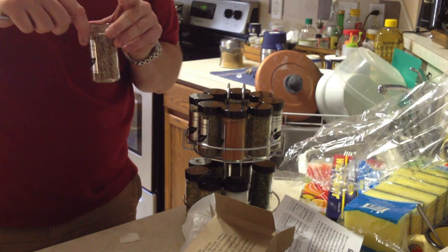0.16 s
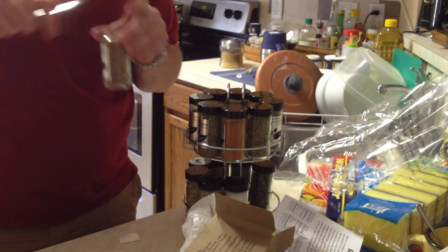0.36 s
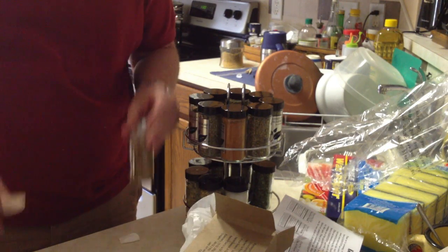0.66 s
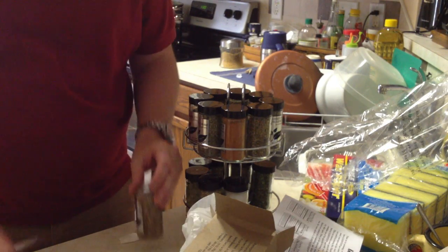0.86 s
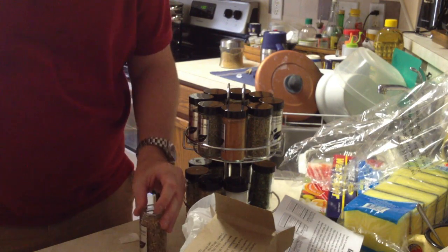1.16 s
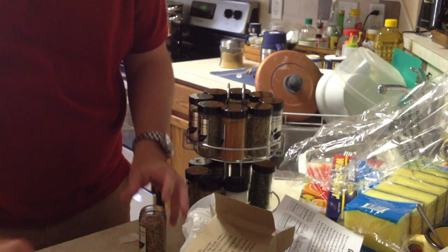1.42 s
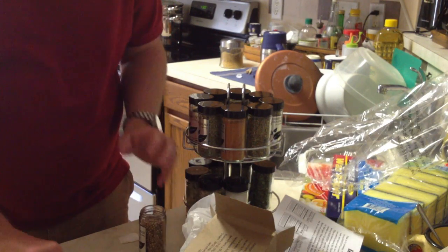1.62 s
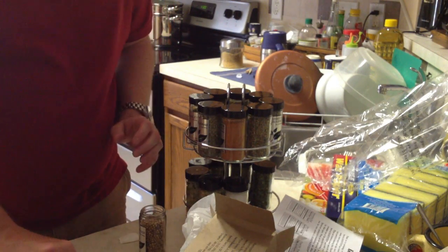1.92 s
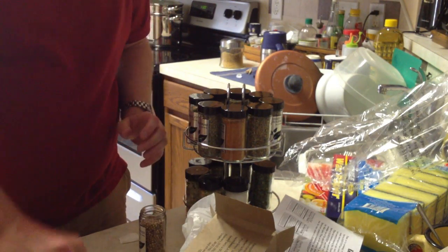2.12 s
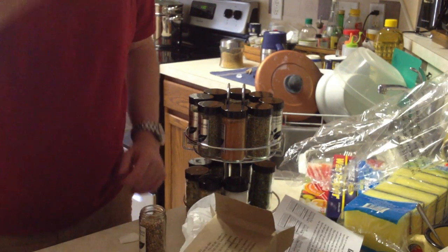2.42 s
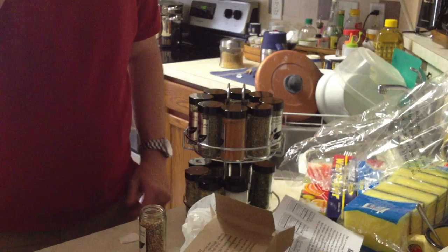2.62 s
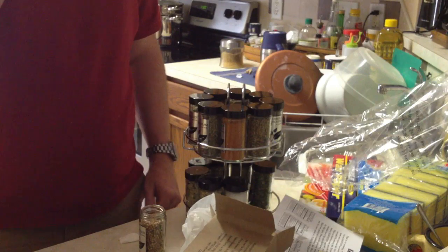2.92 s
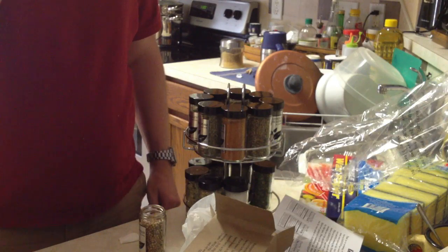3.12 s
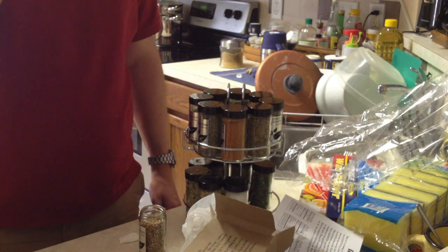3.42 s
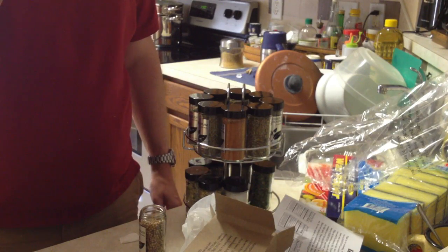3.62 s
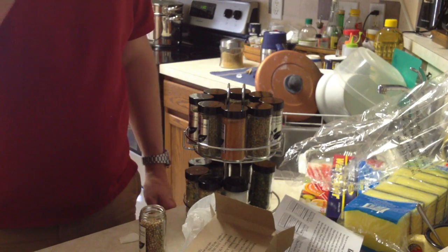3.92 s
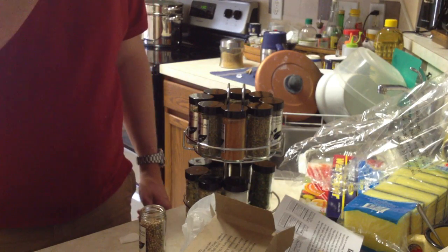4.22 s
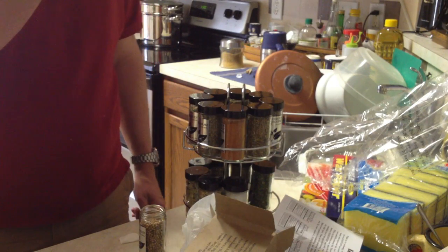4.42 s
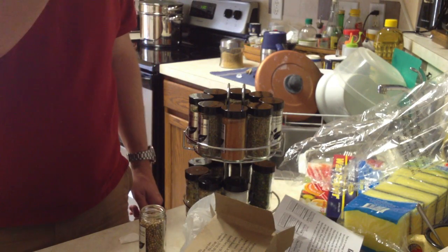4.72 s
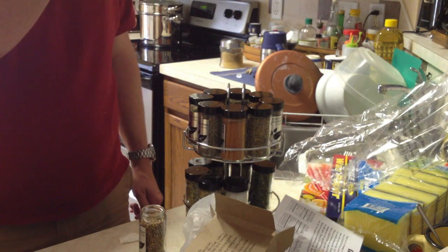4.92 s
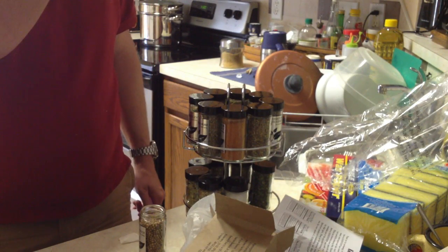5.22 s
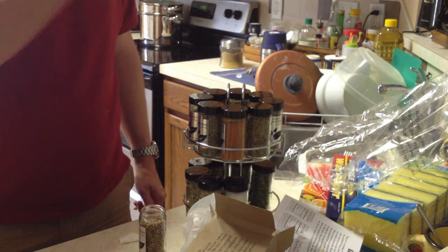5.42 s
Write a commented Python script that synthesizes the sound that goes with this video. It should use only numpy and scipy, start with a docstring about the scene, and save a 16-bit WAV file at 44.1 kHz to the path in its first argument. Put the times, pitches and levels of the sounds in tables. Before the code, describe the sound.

A spice jar is set down with sharp knocks, light metal clatters beside it, and scattered plastic clicks follow over a faint hum.

```python
"""A small, hard kitchen, one microphone close to the counter, a refrigerator humming behind. A small
glass spice jar is set down, edge first, then flat: the board knocks and shudders, and the seeds inside
slide. A light metal piece, likely a funnel, drops beside it and bounces, ringing. Fingers rub a plastic
lid, which clicks as it slips against a jar, faintly at first and more clearly later."""
import sys
import numpy as np
from scipy import signal
from scipy.fft import rfft, irfft
from scipy.io import wavfile

SR = 44100
rng = np.random.default_rng(int(sys.argv[2]) if len(sys.argv) > 2 else 0)


def put_to_file(sound):
    """Save the sound as 16-bit audio at rate SR, in the file named by the first command-line argument."""
    columns = np.atleast_2d(sound).T  # one column per channel
    safe = np.clip(columns, -1, 1)
    whole_steps = np.round(safe * 32767)
    wavfile.write(sys.argv[1], SR, whole_steps.astype(np.int16))


N = 245195


def amp(db):
    """Decibels to amplitude."""
    return 10 ** (np.asarray(db) / 20)


def read(points, hz):
    """A spectrum's value on a log-frequency axis."""
    f, value = np.transpose(points)
    return np.interp(np.log(hz + 1), np.log(f + 1), value)


def add(mix, s, sound):
    """Mixes a sound in at s seconds."""
    part = mix[round(s * SR):][:len(sound)]
    part += sound[:len(part)]


def wander(per_s, size):
    """A slow random curve of rms about 1."""
    knots = rng.standard_normal(size=400)
    return np.interp(np.arange(size) * per_s / SR, np.arange(len(knots)), knots)


def coloured(noise, colour):
    """Gives noise a spectrum, at rms 1."""
    gain = amp(read(colour, np.fft.rfftfreq(len(noise), 1 / SR)))
    shaped = irfft(rfft(noise) * gain, len(noise))
    return shaped / np.sqrt(np.mean(shaped ** 2) + 1e-20)


def pulse(colour, corner_hz=SR, weight_db=0, size=2048):
    """A click of peak 1 with this colour; a soft contact loses treble, a heavy one gains bass."""
    hz = abs(np.fft.fftfreq(size, 1 / SR))
    contact = 1 / np.sqrt(1 + (hz / corner_hz) ** 8) + amp(-46)
    bass_db = weight_db / (1 + (hz / 400) ** 2)
    log_gain = np.log(amp(read(colour, hz) + bass_db) * contact)
    minimum_phase = np.exp(np.conj(signal.hilbert(log_gain)))
    click = np.fft.ifft(minimum_phase).real[:size // 2]
    return click / abs(click).max()


def scatter(sound, decay, size):
    """Dense echoes of a sound, each band dying at its own speed; decay pairs Hz with t60 in seconds."""
    taps = rng.choice([-1., 1.], size) * (rng.random(size) < .25)
    hz, t, bands = signal.stft(taps, SR, nperseg=256)
    t60 = np.maximum(read(decay, hz), .005)[:, None]
    tail = signal.istft(bands * amp(-60 * t / t60), SR, nperseg=256)[1]
    return signal.fftconvolve(sound, tail / np.linalg.norm(tail))


def ring(modes, blows, centre_hz, uneven_db=1, rock_db=0, rocks_per_s=24, settle_s=1.0, size=65536):
    """Blows feed each mode and jolt its phase; any rocking makes it swell and dip until it settles."""
    s, db, tilt_db = np.transpose(blows)
    t = np.arange(size) / SR
    at = np.round((s - s.min()) * SR).astype(int)
    sway_db = rock_db * np.exp(-t / settle_s)
    out = np.zeros(N)
    for hz, mode_db, t60 in modes:
        kick_db = db + mode_db + tilt_db * np.log2(hz / centre_hz)
        kicks = amp(kick_db + uneven_db * rng.standard_normal(len(s))) ** 2
        retained = amp(-60 / t60 / SR) ** 2
        energy = signal.lfilter([1], [1, -retained], np.bincount(at, kicks, size) + 1e-30)
        # a hard blow resets the phase
        jolts = np.pi * rng.standard_normal(len(s)) * np.sqrt(kicks / energy[at])
        phase = 2 * np.pi * hz * t + np.cumsum(np.bincount(at, jolts, size))
        rocking = amp(sway_db * np.tanh(wander(rocks_per_s, size)))
        add(out, s.min(), np.sqrt(energy) * rocking * np.sin(phase))
    return out


def grains(moves, colour, per_s, rise_db_per_s, fall_db_per_s):
    """Many tiny impacts that swell, hold and die away with each move."""
    t = np.arange(N) / SR
    impacts = rng.standard_normal(N) * (rng.random(N) < per_s / SR)
    flow = np.zeros(N)
    for s, db, hold_s in moves:
        before, after = np.maximum(s - t, 0), np.maximum(t - s - hold_s, 0)
        flow += amp(db - rise_db_per_s * before - fall_db_per_s * after)
    return coloured(impacts, colour) * flow


def room_tone(level_db=-69):
    """Soft, steady hiss under everything."""
    # The hiss's colour. Each row: frequency in Hz, relative level in dB.
    air = [(25, -27.5), (70, -1.5), (120, 1), (190, -2.5), (320, -4), (450, -7), (800, -10), (2200, -13.5),
           (4800, -13.5), (5800, -15.5), (8000, -16), (10500, -23), (13500, -15), (15400, -17)]
    return amp(level_db) * coloured(rng.standard_normal(N), air)


def refrigerator(waver=0.159, drift_rad=0.64):
    """A low hum in the background, each tone wavering in level and phase."""
    # Each row: frequency in Hz, rms level in dB.
    tones = [(120.2, -70), (198, -79.5), (241, -81), (295, -82), (361, -83.5)]
    t = np.arange(N) / SR
    hum = np.zeros(N)
    for hz, db in tones:
        level = amp(db) * np.sqrt(2) * (1 + waver * wander(3.9, N))
        hum += level * np.sin(2 * np.pi * hz * t + drift_rad * wander(5.9, N))
    return hum


def kitchen(sound, delay_s=.004):
    """The diffuse echo of cupboards and walls, reaching the microphone just after the direct sound."""
    # The room's decay. Each row: frequency in Hz, t60 in seconds.
    decay = [(120, 1), (400, 0.46), (1200, 0.72), (4000, 0.6), (8000, 0.55), (15000, 0.36)]
    echo = np.zeros(N)
    add(echo, delay_s, scatter(sound, decay, size=32768))
    return echo


def fingers():
    """Skin catches on plastic as the fingers stroke the lid."""
    # Each row: time of full pressure in seconds, level in dB, hold in seconds.
    strokes = [(0.01, -77, 0.043), (0.37, -77.5, 0.13), (2.31, -74, .05), (2.63, -74.5, 0.08),
               (3.79, -77, .02), (3.945, -71.5, 0.023), (4.56, -75.5, 0.063), (4.98, -73, 0.013),
               (5.44, -79.5, 0.023)]
    # The rubbing's colour. Each row: frequency in Hz, relative level in dB.
    colour = [(300, -10), (1000, -1.5), (2000, 0), (3000, -13.5), (4300, 4.5), (5600, -6), (7900, 2.5),
              (10000, -14), (15000, -16.5)]
    return grains(strokes, colour, per_s=2000, rise_db_per_s=400, fall_db_per_s=132)


def lid(slips=4, slip_gap_s=.0045, tighten_db=5, chatter_db=-4):
    """Plastic slips over glass in quick runs: a sharp snap, a dry tick, a hollow body, a brief chatter."""
    # Each row: start in seconds, body level in dB, body pitch in Hz, snap level in dB, tick level in dB,
    # contact corner in Hz, growth per slip in dB.
    clicks = [(0.2344, -68, 1850, -47, -44.5, 13900, -3), (0.293, -72, 1850, -47, -49, 15000, -6),
              (0.3668, -63, 1800, -48, -53, 12100, -5), (2.304, -67, 1850, -51, -60, 9000, -8),
              (2.346, -59, 1750, -61.5, -60, 7000, -4), (3.1763, -37.5, 1667, -38.5, -55, 15000, 4),
              (3.4362, -34.5, 1675, -39, -44, 10900, -3.5), (3.5592, -50, 2220, -72, -51.5, 3700, -5),
              (3.598, -73, 1970, -53, -71, 12200, -17), (3.937, -59, 1900, -49.5, -49.5, 10000, -2),
              (4.289, -59, 2010, -49.5, -62, 7800, -3), (4.358, -42.5, 1960, -32.5, -38, 9000, -14),
              (4.926, -77, 2020, -68, -57.5, 2500, -15), (5.257, -72, 1990, -50, -61, 13060, -18)]
    # The lid's hollow body. Each row: multiple of its pitch, relative level in dB.
    hollow = [(.06, -34), (.25, -16.5), (.75, -14), (1, 7.5), (1.11, -0.5), (1.25, 1), (1.75, -10),
              (2.52, 4), (3.3, -21.5), (9, -67)]
    # Colours of snap and tick. Each row: frequency in Hz, relative level in dB.
    snap_colour = [(300, -31), (3000, -33), (5800, -24), (7200, -7), (8800, -2), (9600, -10.5),
                   (10300, -16.5), (12000, -10), (15500, -15.5)]
    tick_colour = [(100, -37), (350, -5), (900, -4.5), (2200, -2), (3500, 3), (5500, -5.5), (9000, -18),
                   (15000, -2)]
    chatter_decay = [(1700, 0.066), (4000, 0.044), (8000, 0.016)]
    out = np.zeros(N)
    for s, body_db, pitch_hz, snap_db, tick_db, corner_hz, growth_db in clicks:
        body = amp(body_db) * pulse([(k * pitch_hz, db) for k, db in hollow], corner_hz)
        tick = amp(tick_db) * pulse(tick_colour, corner_hz)
        snap = amp(snap_db) * pulse(snap_colour, corner_hz)
        for slip in range(slips):
            # the lid sits tighter with each slip, so body and tick fall behind the snap
            click = amp(slip * growth_db) * (snap + amp(-slip * tighten_db) * (body + tick))
            start = s + slip * slip_gap_s
            add(out, start, click)
            add(out, start, amp(chatter_db) * scatter(click, chatter_decay, size=2048))
    return out


def funnel():
    """Light metal bounces on the counter: returns the short, noisy clashes and the ring they leave."""
    # Each row: start in seconds, ring level in dB, tilt in dB per octave, clash level in dB.
    bounces = [(1.3336, -60, -5, -8.5), (1.3386, -35.5, 1.5, -13.5), (1.3473, -47.5, 16.5, -26),
               (1.3814, -48.5, -9.5, -8.5), (1.4041, -37, -1.5, -31), (1.41, -40.5, 0, -21),
               (1.4282, -38, -2.5, -19), (1.442, -45, 6.5, -13)]
    # The metal's modes. Each row: frequency in Hz, relative level in dB, t60 in seconds.
    modes = [(1727, -11, .45), (1745, -8, .38), (1794, -7.5, .3), (2525, -13, .4), (3408, -14, .5),
             (3429, -25, 1.3), (3779, -27.5, 4.6), (3781, -25, 2.2), (4975, -14, .55), (5236, -13, .4),
             (6146, -21, 1.5), (6152, -11, .4), (6621, -13, .45), (6646, -9, .48), (6944, -14, .35),
             (7991, -1, .45), (8590, -2, .62), (8591, -20, 2.1), (8594, -23, 2.1), (9457, -14, .72),
             (9976, -5, .42), (10756, -8, .5), (12281, -6, .36), (12326, -5, .33), (12620, -19, .3),
             (14020, -19, .22), (14262, -14, .3), (14860, -13, .29), (14930, -14, .29)]
    # The clash's colour. Each row: frequency in Hz, relative level in dB.
    colour = [(500, -22), (2500, -0.5), (4500, 2), (5600, -10), (6600, 5.5), (8500, -4), (10500, -2.5),
              (11500, -21), (12300, 11.5), (13400, -22), (14500, -6)]
    clashes, edge = np.zeros(N), pulse(colour)
    for s, _, _, clash_db in bounces:
        add(clashes, s, amp(clash_db) * scatter(edge, [(2000, 0.091), (12000, 0.082)], size=8192))
    blows = [row[:3] for row in bounces]
    ringing = ring(modes, blows, centre_hz=6000, uneven_db=2.5, rock_db=6, rocks_per_s=29.6, size=3 * SR)
    return clashes, ringing


def seeds():
    """The seeds slide each time the jar tips onto the counter."""
    # Each row: time of full flow in seconds, level in dB, hold in seconds.
    slides = [(0.895, -46.5, 0.016), (1.065, -50.5, 0.05)]
    # The sliding's colour. Each row: frequency in Hz, relative level in dB.
    colour = [(500, -19), (2500, -5.5), (4500, 5), (5600, -4), (7500, 1), (8800, -2.5), (10000, -11),
              (13500, -16), (15500, -23)]
    return grains(slides, colour, per_s=4900, rise_db_per_s=1293, fall_db_per_s=194)


def rattle(knocks, count=3, gap_s=0.012, uneven=.25, fade_db=3, corner_share=0.93):
    """Lists each knock and the lighter, duller contacts after it, unevenly spaced and fading."""
    contacts = []
    for s, db, corner_hz, weight_db, rattle_db in knocks:
        contacts.append((s, db, corner_hz, weight_db))
        gaps = gap_s * (1 + uneven * rng.uniform(-1, 1, count))
        for k, delay in enumerate(np.cumsum(gaps)):
            contacts.append((s + delay, db + rattle_db - k * fade_db, corner_hz * corner_share, weight_db))
    return contacts


def counter(shudder_db=-2, modes_db=-29):
    """Each blow is a push, a brief shudder of the board and what stands on it, and a few low modes."""
    # Each row: start in seconds, level in dB, contact corner in Hz (harder is brighter),
    # bass weight in dB, rattle in dB relative to the knock.
    knocks = [(0.876, -44.5, 695, 19, -7), (0.9038, -15, 2170, -1, -7), (0.9405, -26, 2620, -9, -13),
              (0.9494, -21, 2150, 3.5, -6.5), (0.9921, -26.5, 2640, -10.5, -11.5),
              (1.066, -15.5, 1150, -7.5, -12), (1.242, -30.5, 2970, -20, -17.5),
              (1.324, -30, 750, -10, -24), (1.3334, -14.5, 3800, 6.5, -8), (1.3800, -22.5, 3930, 4.5, -10),
              (1.3856, -15, 3700, -5, -17), (1.429, -26, 2070, -3, -17)]
    # Modes of counter top and jar. Each row: frequency in Hz, relative level in dB, t60 in seconds.
    modes = [(130, -11, .35), (215, -7, .25), (362, 1.5, .4), (519, 2, .28), (555, -2, .25), (749, -1, .3),
             (857, -3, .3), (937, -3, .24), (1060, -5, .2), (1413, -8, .2), (1481, -8, .18),
             (1760, -8, .18), (2030, -10, .15)]
    # A blow's colour. Each row: frequency in Hz, relative level in dB.
    colour = [(40, -30), (85, -29), (130, -14), (250, 4), (430, 3), (700, 3), (1000, 5), (1300, 1),
              (1800, 3.5), (3000, 3), (5400, -9.5), (8000, -1), (15000, -0.5)]
    shudder_decay = [(200, 0.1), (800, 0.11), (2000, 0.021), (9000, 0.044)]
    contacts = rattle(knocks)
    blows = [(s, db, -weight_db / 3) for s, db, _, weight_db in contacts]  # weight tilts the ring low
    out = amp(modes_db) * ring(modes, blows, centre_hz=700)
    for s, db, corner_hz, weight_db in contacts:
        push = pulse(colour, corner_hz, weight_db)
        add(out, s, amp(db) * push)
        add(out, s + 0.00039, amp(db + shudder_db) * scatter(push, shudder_decay, size=8192))
    return out


def scene():
    """Jar, funnel and lid up close, each with its share of the room, over hum and hiss."""
    knocks = counter() + seeds()
    clashes, ringing = funnel()
    clicks = lid() + fingers()
    echo = kitchen(amp(-3.5) * knocks + amp(-2.5) * clashes + amp(-9) * ringing + amp(-4) * clicks)
    return (knocks + clashes + ringing + clicks + echo + refrigerator() + room_tone())[None]


def record(dry, low_cut_hz=105, high_cut_hz=15400):
    """The microphone's signal passes a bass cut and a steep treble limit."""
    bass_cut = signal.butter(N=5, Wn=low_cut_hz, btype="high", fs=SR, output="sos")
    band_limit = signal.firwin(401, high_cut_hz, window=("kaiser", 8), fs=SR)
    return signal.oaconvolve(signal.sosfilt(bass_cut, dry), band_limit[None], "same")


dry = scene()
out = record(dry)
put_to_file(out)
```